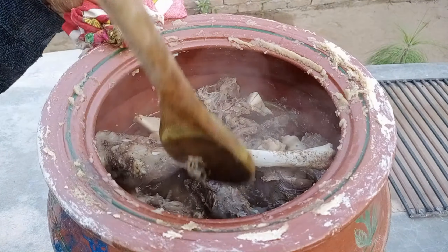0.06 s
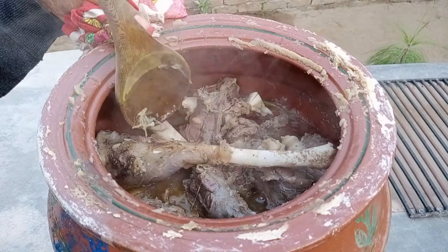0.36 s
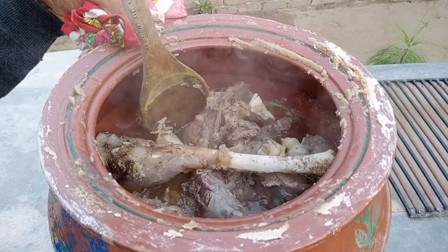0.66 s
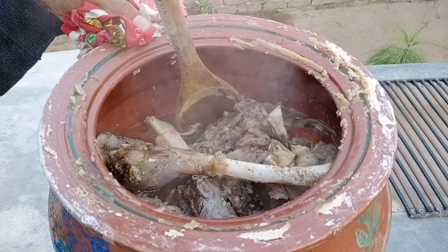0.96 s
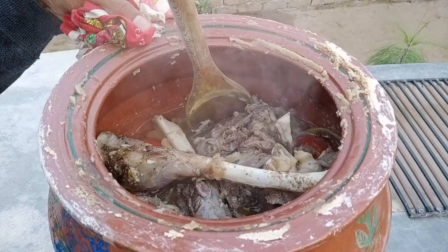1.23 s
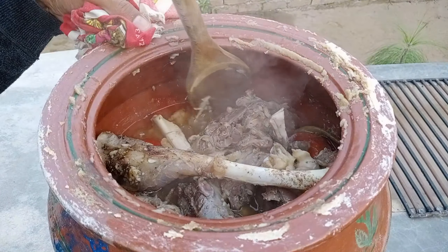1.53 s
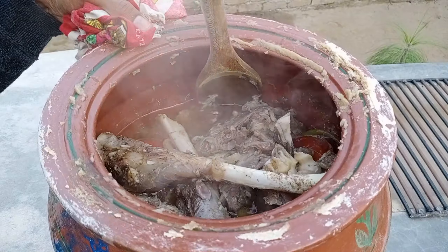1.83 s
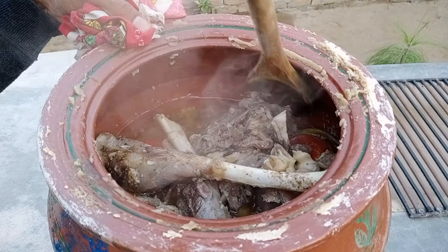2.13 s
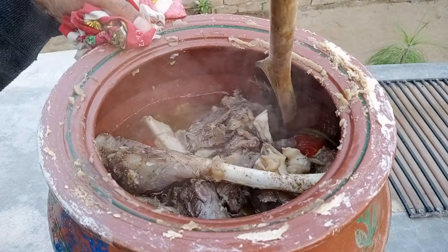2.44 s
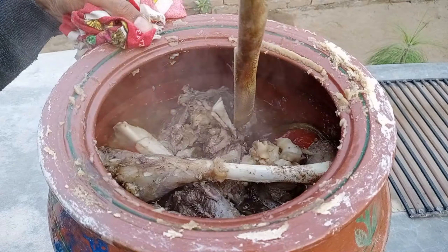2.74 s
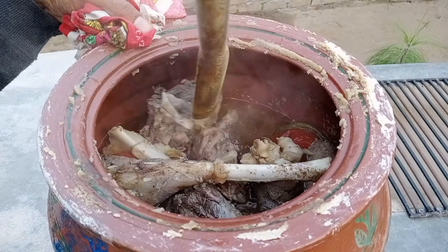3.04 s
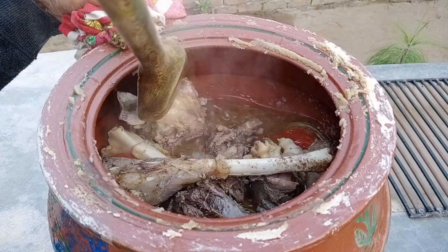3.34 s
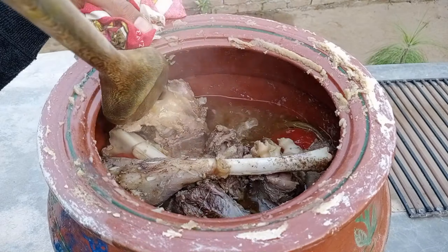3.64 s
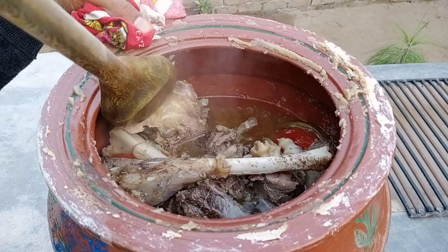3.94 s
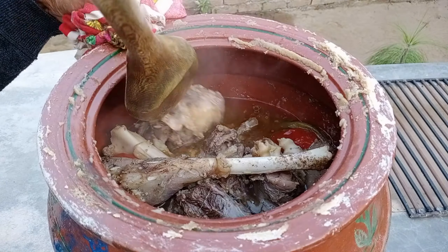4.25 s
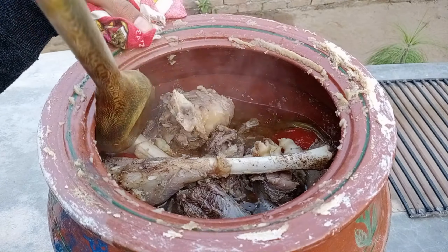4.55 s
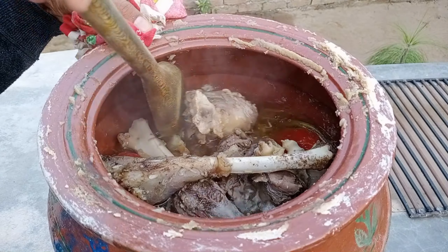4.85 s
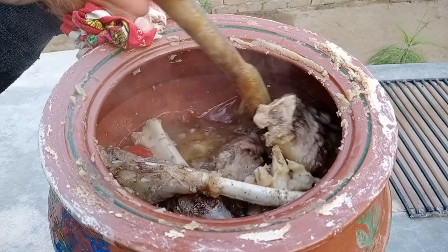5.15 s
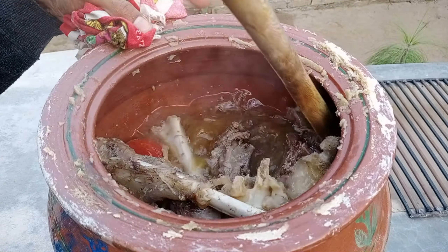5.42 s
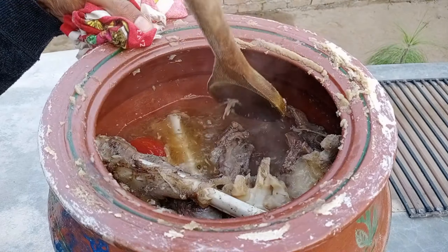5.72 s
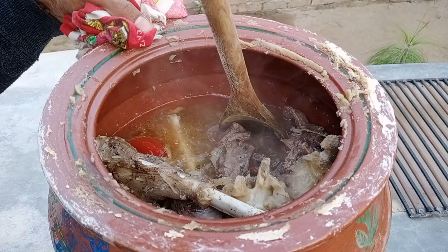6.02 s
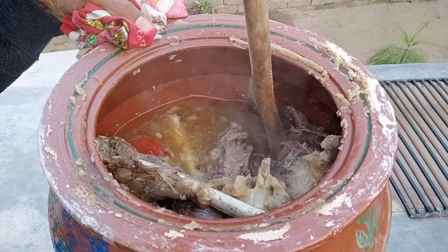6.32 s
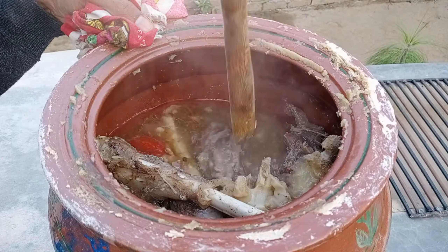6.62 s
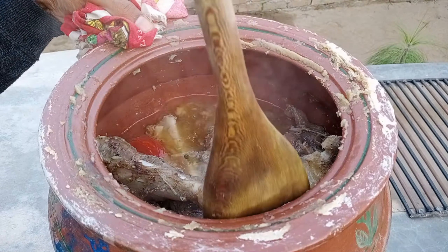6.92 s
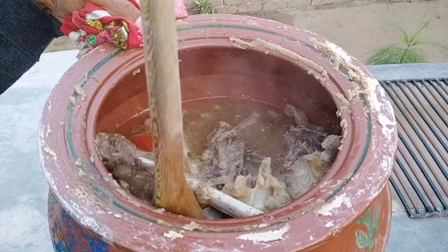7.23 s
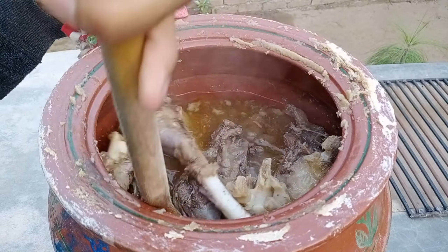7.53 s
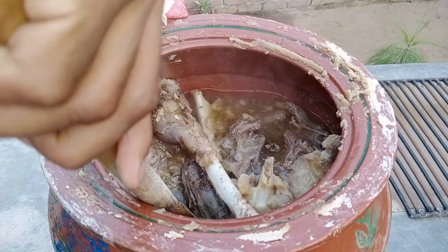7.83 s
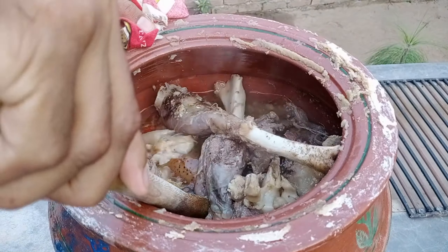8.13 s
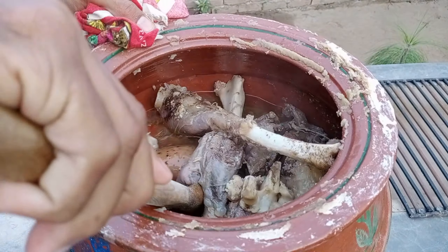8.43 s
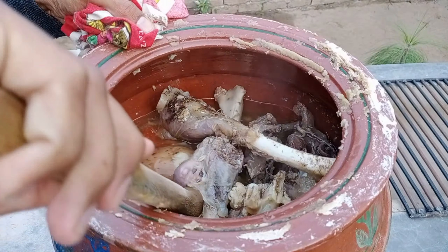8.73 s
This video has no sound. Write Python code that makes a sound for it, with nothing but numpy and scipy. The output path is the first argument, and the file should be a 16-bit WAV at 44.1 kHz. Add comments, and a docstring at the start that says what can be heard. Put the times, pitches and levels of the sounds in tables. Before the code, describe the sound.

Close to the microphone, meat and broth squelch and slosh in uneven strokes while a wooden spoon and bones knock and scrape a clay pot, making it ring briefly. Tiny bubbles pop and the heavy pot gives dull bumps. The strongest strokes come in the second half, ending with a loud plop and a few lighter wet smacks. Behind is a quiet yard with distant birds and a slight echo.

```python
"""Wet sloshes, smacks and hollow knocks, close up: a wooden spoon stirs meat, bones and broth in a clay pot.
Spoon and bones strike and scrape the clay, ringing its wall and the air inside. The broth plops in the
hollow, wet films on the meat tear and snap, and the heavy pot gives dull bumps. Birds whistle far off
over the soft air of a quiet yard, whose walls return a short echo."""
import sys
import numpy as np
from scipy import signal
from scipy.fft import rfft, irfft, next_fast_len
from scipy.io import wavfile
from scipy.ndimage import uniform_filter1d, map_coordinates

SR = 44100
rng = np.random.default_rng(int(sys.argv[2]) if len(sys.argv) > 2 else 0)


def generate_wav(sig):
    """Save sig (samples, or channels by samples) to the path in sys.argv[1] as 16-bit PCM at SR."""
    pcm = np.round(np.clip(np.atleast_2d(sig).T, -1, 1) * 32767).astype(np.int16)
    wavfile.write(sys.argv[1], SR, pcm)


N = 391166
T = np.arange(int(.6 * SR)) / SR  # time axis of a one-shot [s]

# knocks on the pot, ending with a small bright bone click and a plop's click:
# (time [s], level [dB], bass weight [dB], hardness [dB], favoured range [Hz],
# range left nearly still [Hz], ring length [x free ring], crack [dB])
KNOCKS = [(0.362, -32.5, -4.5, 1.5, 1086, 320, .78, 4.5), (1.4577, -28, 3.5, -4, 2000, 950, .73, 5),
          (1.861, -42, 2.5, 1.5, 600, 6500, .95, 5), (2.359, -34.5, -3, 2.5, 1300, 600, .7, 5),
          (4.368, -34, -3.5, -8, 1460, 2700, .7, 2.5), (4.578, -45, -2, 7, 910, 560, .83, 10),
          (5.22, -41.5, 0, -9, 843, 2700, .96, 19), (5.4568, -40.5, 2, -7.5, 1460, 900, .74, 2),
          (6.8773, -29, 1, -23, 1365, 950, .72, 7), (8.088, -53.5, -4, 0.5, 1660, 700, .9, 3),
          (8.468, -62, -14, 16, 3300, 1400, 1, 2), (8.809, -68.5, -4.5, 13, 625, 1800, .5, 2.5)]
# the registers in which a knock is balanced: (band edge [Hz])
REGISTERS = [200, 520, 750, 1100, 2000, 3400, 5300, 15000]
# modes of the clay wall: (frequency [Hz], level [dB], t60 [s])
CLAY = [(381, -2.5, 0.13), (564, -3, 0.33), (586, -1, 0.37), (876, 4, 0.14), (1235, -27.5, 0.087),
        (1273, -10, .16), (1322, -4, 0.14), (1529.7, 0, 0.24), (1568, -13, .22), (1871, -15, 0.049),
        (2160, -14, .09), (2500, -6.5, 0.14), (2830, -17, 0.017), (3340, -29, 0.16), (3538, -7.5, 0.13),
        (3810, -13.5, 0.12), (4410, -10, .06), (4447, -35, .05), (5470, -11, .05), (6700, -18, .04)]
# the wall's lightly damped notes, which sing on: (frequency [Hz], level [dB], t60 [s])
SINGING = [(605, -5, .35), (907, -4, 0.61), (1582, -0.5, 0.18), (2570, -7.5, 0.32), (3380, -13, 0.2),
           (4080, -15.5, 0.12)]
# modes of the air above the broth: (frequency [Hz], level [dB], t60 [s])
HOLLOW = [(169.2, -28, .15), (322, -1.5, 0.39), (366, 0, 0.26), (412, -4, 0.073), (490, -8.5, 0.1),
          (615, 7.5, 0.045), (885, -4, 0.19)]


def amp(db):
    """Decibels to gain."""
    return 10 ** (np.asarray(db) / 20)


def unit(x):
    """Scale to rms 1."""
    return x / np.sqrt(np.mean(x ** 2) + 1e-20)


def along(points, hz):
    """Read a (frequency [Hz], value) curve on a log axis."""
    freqs, values = np.transpose(points)
    return np.interp(np.log(hz + 1), np.log(freqs + 1), values)


def add(track, s, sound):
    """Mix a sound in at s seconds."""
    start = round(s * SR)
    sound = sound[max(0, -start):]
    room = track[max(0, start):][:len(sound)]
    room += sound[:len(room)]


def fade(t60):
    """Exponential decay; 1 - fade makes an attack."""
    return amp(-60 * T / max(t60, 1e-4))


def wobble(rate, size=N):
    """A smooth random curve, rate knots a second."""
    knots = rng.standard_normal(int(size * rate / SR) + 4)
    return map_coordinates(knots, [np.arange(size) * rate / SR])


def filtered(x, response):
    """Zero-phase EQ; response gives the gain at each frequency."""
    n = x.shape[-1]
    padded = next_fast_len(n + SR // 4)
    return irfft(rfft(x, padded) * response(np.fft.rfftfreq(padded, 1 / SR)), padded)[..., :n]


def coloured(x, points, size=4096):
    """Minimum-phase EQ through (frequency [Hz], gain [dB]) points."""
    cepstrum = irfft(np.log(amp(along(points, np.fft.rfftfreq(size, 1 / SR)))))
    cepstrum[1:size // 2] *= 2
    cepstrum[size // 2 + 1:] = 0
    return signal.fftconvolve(x, irfft(np.exp(rfft(cepstrum))))[:len(x)]


def ring(modes, length=1, scatter_db=2, detune=.003):
    """One ring of a set of modes, each with a fresh strength, tuning and polarity."""
    luck = rng.standard_normal((len(modes), 3))
    return sum(np.sign(polarity) * amp(db + scatter_db * strength) * fade(t60 * length)
               * np.sin(2 * np.pi * hz * (1 + detune * tuning) * T)
               for (hz, db, t60), (strength, tuning, polarity) in zip(modes, luck))


def through(x, modes, length=1):
    """x rings a set of modes, at unit energy gain."""
    answer = ring(modes, length)
    return signal.fftconvolve(x, answer / np.linalg.norm(answer))[:N]


def grains(rate, spread_db):
    """Random tiny impulses of uneven size, rms 1."""
    clicks = (rng.random(N) < rate / SR) * rng.choice([-1, 1], N)
    return unit(clicks * amp(spread_db * np.clip(rng.standard_normal(N), -2, 2)))


def shifting(x, depth_db, size=1024, frames=5):
    """Narrow resonances that come and go every few hundredths of a second."""
    spectra = signal.stft(x, nperseg=size, noverlap=size * 3 // 4)[2]
    field = rng.standard_normal(spectra.shape[-2:])
    for _ in range(2):
        field = uniform_filter1d(uniform_filter1d(field, size=4, axis=0), size=frames, axis=1)
    gain = amp(depth_db * np.clip(unit(field), -2, 2))
    return signal.istft(spectra * gain, nperseg=size, noverlap=size * 3 // 4)[1][..., :N]


def echo(x):
    """The yard's walls answer in stereo, each frequency dying at its own speed."""
    # decay of the yard: (frequency [Hz], t60 [s])
    decay = [(150, 0.4), (350, 0.58), (1500, 0.32), (4000, 0.09), (10000, 0.04)]
    hz, t, spectra = signal.stft(rng.standard_normal((2, len(T))), SR, nperseg=256)
    tail = signal.istft(spectra * amp(-60 * t / along(decay, hz)[:, None]), SR, nperseg=256)[1]
    predelayed = np.pad(x, (SR // 200, 0))
    return signal.fftconvolve(predelayed[None], tail / np.linalg.norm(tail[0]), axes=1)[:, :N]


def yard():
    """A bed of quiet, restless outdoor air, with a narrow band of hiss high up."""
    # tone of the air: (frequency [Hz], spectral density [dB])
    air_tone = [(15, -79), (25, -32), (91, 5), (198, 1.5), (421, -6), (523, -11), (871, -7), (1490, -10),
                (2170, -12), (2630, -15), (2920, -16), (6050, -27), (6920, -16.5), (7700, -26.5),
                (15500, -20)]
    # stereo width of the air: (frequency [Hz], left-right correlation [0..1])
    likeness = [(60, .94), (600, 0.28), (1400, 0.42), (3100, 0.23), (6800, 0.25), (15000, 0.23)]
    hiss_tone = [(5200, -48.5), (6300, -12.5), (6900, 4.0), (7400, -6.5), (8300, -31.5), (10000, -46.5)]

    def mid_side(hz):
        width = np.arccos(np.clip(along(likeness, hz), -1, 1)) / 2
        return amp(along(air_tone, hz)) * [np.cos(width), np.sin(width)]
    mid, side = filtered(rng.standard_normal((2, N)), mid_side)
    stereo = np.array([mid + side, mid - side])
    air = amp(-70 + 0.31 * wobble(1)) * unit(shifting(stereo, depth_db=3.5, frames=9))
    fizz = grains(rate=890, spread_db=4.0) + 0.27 * rng.standard_normal((2, N))
    hiss = filtered(fizz, lambda hz: amp(along(hiss_tone, hz)))
    return air + amp(-74.0 + 2.2 * wobble(0.98)) * unit(hiss)


def pressure_db(s):
    """Level of wet seeping as the spoon leans on the meat."""
    # weight of the resting spoon: (time [s], seeping level [dB])
    pressure = [(0, -67), (.5, -73), (1.1, -77.5), (2, -73), (2.95, -78.5), (3.3, -68.5), (5.3, -70.5),
                (5.6, -82), (6.85, -74.5), (7.5, -72), (8.85, -71)]
    return np.interp(s, *np.transpose(pressure))


def push(rise, t60, swell_db=23.5):
    """A swell that gains swell_db over its rise, peaks after one span of T and dies away."""
    return np.concatenate([amp(-swell_db * (T[::-1] / rise) ** 2), fade(t60)])


def stir_envelopes():
    """Slosh, scrape and squelch gains: the resting spoon, every push and the sway after each knock."""
    # pushes of the spoon: (peak time [s], rise [s], slosh [dB], scrape [dB], squelch [dB])
    pushes = [(0.521, .012, -58, -54.5, -55), (0.78, .17, -58, -49, -58), (1.565, 0.12, -47, -45.5, -62.5),
              (2.002, .15, -50, -41.5, -57.5), (2.195, 0.11, -54, -60, -79), (2.47, .06, -53, -70, -80.5),
              (2.605, 0.063, -51, -43.5, -48), (2.66, 0.0475, -55.5, -78, -65.5),
              (3.462, 0.083, -81, -78, -59.5), (3.81, 0.13, -98.5, -55.5, -84), (4.15, 0.16, -69, -73, -67),
              (4.541, 0.1, -66, -51, -57), (4.727, 0.065, -53, -52, -49), (4.99, 0.13, -53, -57, -63.5),
              (5.15, .16, -48, -43.5, -53.5), (5.297, 0.12, -40.5, -38, -45.5),
              (5.52, 0.045, -54.5, -78, -86), (6.991, 0.1, -51.5, -47.5, -60),
              (7.191, 0.094, -39.5, -34.5, -52.5), (7.521, 0.14, -80.5, -61.5, -65),
              (8.12, 0.04, -53, -70, -67.5), (8.29, 0.15, -102, -80.5, -61), (8.56, 0.092, -83, -75, -60)]
    slosh_lag_s, slosh_stretch, slosh_t60 = 0.0093, 1.4, 0.28  # broth follows late and gathers slowly
    sway_db, sway_delay_s = -17.5, 0.077  # relative to the knock
    rest = amp(pressure_db(np.arange(N) / SR))
    slosh, scrape, squelch = amp(-10.5) * rest, amp(-9) * rest, amp(0.5) * rest
    for s, rise, slosh_db, scrape_db, squelch_db in pushes:
        start = s - T[-1]
        add(slosh, start + slosh_lag_s, amp(slosh_db) * push(rise * slosh_stretch, slosh_t60))
        add(scrape, start, amp(scrape_db) * push(rise, t60=0.21))
        add(squelch, start, amp(squelch_db) * push(rise, t60=0.2))
    for s, db, *_ in KNOCKS:
        add(slosh, s + sway_delay_s - T[-1], amp(db + sway_db) * push(sway_delay_s / 2, slosh_t60))
    return slosh, scrape, squelch


def stirring():
    """The spoon pushes broth about the hollow, drags on the clay and squeezes wet meat."""
    # tone of lapping broth: (frequency [Hz], gain [dB])
    splash_tone = [(50, -33.5), (110, -12.5), (200, -9.5), (310, 5), (450, 2.5), (600, -4), (750, -16),
                   (1000, -7), (1500, -23.5), (3000, -60)]
    # tone of wood dragging on clay: (frequency [Hz], gain [dB])
    rasp_tone = [(500, -37.5), (1100, -6.5), (1600, 3), (2600, 1), (3400, -3.5), (4500, -15), (8000, -59.5)]
    # tone of squeezed meat: (frequency [Hz], gain [dB])
    squelch_tone = [(1500, -33), (3000, -11), (4000, 3.5), (5000, -6.5), (7000, 7.5), (8500, -12.5),
                    (10000, -29.5), (15000, -27.5)]
    slosh, scrape, squelch = stir_envelopes()
    lapping = unit(coloured(grains(rate=540, spread_db=3.5), splash_tone))
    hollow = unit(through(lapping, HOLLOW, length=0.59))
    broth = slosh * unit(shifting(lapping + hollow, depth_db=6.0))
    # the contact point wanders, so ever different modes of the wall answer
    slips = grains(rate=1200, spread_db=5.0)
    rubbed = slips + .85 * through(slips, CLAY, length=.35)
    clay = scrape * unit(shifting(coloured(rubbed, rasp_tone), depth_db=9.5))
    # only a firm stroke sets the whole wall singing
    firm = scrape / (scrape + amp(-45))
    singing = through(firm * scrape * slips, SINGING)
    # wet films tear in clumps: some crackle openly, some inside air pockets that keep changing shape
    clumps = grains(rate=1300, spread_db=-0.5) * amp(3.54 * wobble(50))
    tearing = unit(coloured(clumps, squelch_tone))
    pocketed = unit(shifting(tearing, depth_db=9.0, frames=7))
    meat = squelch * unit(0.55 * tearing + pocketed)
    return amp(-2) * broth + amp(-6) * clay + amp(-10) * singing + amp(-1) * meat


def smack(db, hz, spray_db):
    """A wet film lets go in a quick burst, rings a few tiny cavities and throws fine spray."""
    t60 = .018
    burst = (fade(t60) + 0.027 * fade(3 * t60)) * (1 - fade(0.002))
    snap, spray = rng.standard_normal((2, len(T))) * burst
    body = coloured(snap, [(300, -45), (hz / 2, -22), (hz * 0.89, -12), (hz, 0),
                           (hz * 1.2, -10), (hz * 1.3, -25), (hz * 2, -32)])
    cavities = ring([(hz, 0, .03), (hz * 0.9, -8, .035), (hz * 0.24, -14, .045), (hz * 0.13, -18, .045)],
                    scatter_db=3, detune=.04)
    spray = coloured(spray, [(2000, -55.5), (5000, -9.5), (8000, -2), (15000, -19.5)])
    wet = body / np.abs(body).max() + 0.31 * cavities * (1 - fade(0.0065))
    return amp(db) * (amp(-7.5) * wet + amp(spray_db - 2) * spray / np.abs(spray).max())


def meat_smacks():
    """Films on the meat tear in steps: a smack, then two weaker after-snaps."""
    # the louder smacks: (time [s], level [dB], pitch [Hz], spray [dB])
    smacks = [(0.1137, -32.5, 7870, 1), (0.5184, -39, 4020, -18), (0.7433, -38.5, 2540, -40),
              (1.548, -35, 6610, -34.5), (2.141, -29.5, 7290, -13), (2.2212, -33, 6670, -35),
              (2.596, -25.5, 2697, -8), (3.3063, -40, 2930, -28), (3.8045, -33.5, 6530, -35),
              (4.1313, -49, 6800, -35), (4.2713, -32, 7060, -32), (5.1511, -30.5, 6260, -36.5),
              (5.347, -32, 7480, -23), (5.5042, -35.5, 7100, -27.5), (5.8846, -38.5, 7130, -35),
              (5.9505, -36.5, 6780, -31.5), (6.398, -40, 6850, -33), (6.5359, -41.5, 6730, -39.5),
              (6.576, -38.5, 7110, -6.5), (7.990, -38.5, 6980, -36), (8.2044, -34.5, 5260, -22)]
    step_db = -11.5
    gaps_s = 0.0083 * rng.uniform(0.56, 2.4, (len(smacks), 2))
    out = np.zeros(N)
    for (s, db, hz, spray_db), gaps in zip(smacks, gaps_s):
        for step, delay in enumerate([0, *np.cumsum(gaps)]):
            add(out, s + delay, smack(db + step_db * step, hz, spray_db))
    return out


def random_smacks():
    """Further small smacks at random times: wet films let go, louder when the spoon presses."""
    pops_per_s, centre_hz, spread_db = 15, 6840, 3.5
    out = np.zeros(N)
    for when, size, pitch in rng.uniform(-1, 1, (int(pops_per_s * N / SR), 3)):
        s = (when + 1) / 2 * N / SR
        db = pressure_db(s) + 20 + spread_db * size
        add(out, s, smack(db, centre_hz * (1 + .08 * pitch), spray_db=-23))
    return out


def birds():
    """Gliding, raspy whistles, smeared by distance; the farthest are falling chirps at random times."""
    # the nearer calls: (time [s], length [s], start pitch [Hz], end pitch [Hz], level [dB])
    near_calls = [(0.235, .11, 2700, 2490, -69), (0.913, 0.15, 2674, 2400, -72),
                  (1.252, .11, 5400, 4744, -62), (1.265, 0.11, 4060, 3380, -61.5),
                  (1.561, .08, 3960, 3660, -65), (1.57, .08, 5490, 4900, -62),
                  (1.691, 0.075, 1507, 1670, -66), (2.899, 0.093, 1297, 1270, -73.5),
                  (3.363, 0.12, 1270, 1158, -74.5), (3.497, .14, 1098, 1089, -67.5),
                  (3.677, 0.4, 1597, 1683, -75), (4.169, 0.058, 2165, 2160, -71),
                  (5.56, 0.098, 2650, 2600, -73.5), (5.673, 0.093, 1107, 1135, -63),
                  (5.79, 0.12, 874, 1013, -61.5), (5.986, 0.052, 1472, 1420, -71)]
    far_per_s, far_s, far_db, far_hz, spread_octaves, fall_ratio = 1.5, 0.056, -75.5, 1390, .25, 0.46
    far_calls = []
    for when, height in rng.random((int(far_per_s * N / SR), 2)):
        hz = far_hz * 2 ** (spread_octaves * (2 * height - 1))
        far_calls.append((when * N / SR, far_s, hz, hz * fall_ratio, far_db))
    out = np.zeros(N)
    for s, length, start_hz, end_hz, db in near_calls + far_calls:
        progress = np.linspace(0, 1, int(length * SR))
        glide = start_hz + (end_hz - start_hz) * progress ** 1.6
        pitch = glide * (1 + .027 * wobble(500, len(progress)))
        swell = np.sqrt(np.abs(np.sin(np.pi * progress))) * amp(3.1 * wobble(130, len(progress)))
        add(out, s, amp(db + 4) * swell * np.sin(2 * np.pi * np.cumsum(pitch) / SR))
    return .5 * out + .85 * echo(out)


def register_levels(x, size=8192):
    """Level [dB] in each register over the first 50 ms of a knock."""
    attack = np.pad(x, (SR // 300, 0))[:SR // 20]
    spectrum = rfft(attack * signal.windows.tukey(len(attack), .12), size)
    power = np.abs(spectrum) ** 2 * 2 / size / len(attack)
    band_power = np.histogram(np.fft.rfftfreq(size, 1 / SR), REGISTERS, weights=power)[0]
    return 10 * np.log10(band_power + 1e-20)


def knocks_and_clicks():
    """Knocks and small clicks ring spoon, clay and hollow; weight adds bass, hardness adds bite."""
    # modes of the hand-damped spoon: (frequency [Hz], level [dB], t60 [s])
    spoon_modes = [(302, -7.5, 0.01), (595, 2, 0.0087), (1170, 2, 0.0067), (1480, -9.5, 0.029),
                   (1850, -9.5, 0.029), (2290, -2.5, 0.036), (2920, -3, 0.025), (4540, -12, 0.033)]
    # tone of an average knock: (frequency [Hz], register level [dB])
    knock_tone = [(320, -8.5), (620, -4.5), (900, -4), (1500, -2.5), (2600, -8), (4200, -15), (9000, -22)]
    # bass lift of a heavy knock: (frequency [Hz], share of the weight [dB/dB])
    weight = [(320, 0.79), (620, 0.41), (1100, 0.11)]
    # treble lift of a hard contact: (frequency [Hz], share of the hardness [dB/dB])
    hardness = [(1500, 0.059), (2600, 0.28), (4200, 1.09), (9000, 1.2)]
    crack_tone = [(30, -42), (100, -25), (350, 0), (2800, 3.0), (4700, -9.0), (5400, -16.5),
                  (7000, -5.5), (9000, -35.0), (15000, -45.5)]
    rattle_tone = [(30, -43.5), (110, -19), (240, -2.5), (450, 4.0), (750, -3.5), (2200, -11),
                   (3300, -18.5), (6000, -31), (12000, -52)]
    spot_boost_db, node_cut_db, spot_octaves = 4.5, 6, 0.53  # the spot struck colours a knock
    centres = np.sqrt(np.multiply(REGISTERS[1:], REGISTERS[:-1]))
    bell = lambda hz: np.exp(-(np.log2(centres / hz) / spot_octaves) ** 2)
    out = np.zeros(N)
    for s, db, weight_db, hard_db, spot_hz, node_hz, length, crack_db in KNOCKS:
        spot = spot_boost_db * bell(spot_hz) - node_cut_db * bell(node_hz)
        tilt = weight_db * along(weight, centres) + hard_db * along(hardness, centres)
        levels = db + along(knock_tone, centres) + tilt + spot
        crack, rattle = rng.standard_normal((2, len(T)))
        crack = coloured(crack * fade(0.024), crack_tone)
        rattle = coloured(rattle * fade(0.19), rattle_tone)  # the jolted contents rumble briefly
        pot = ring(CLAY, length) + amp(-4) * ring(HOLLOW) + amp(-15.5) * ring(SINGING, length)
        spoon = ring(spoon_modes, detune=0.053)
        hit = pot + amp(crack_db + 7.5) * crack + amp(crack_db - 0.5) * spoon + amp(9.5) * rattle
        for _ in range(3):  # EQ each register towards its level
            hit = coloured(hit, np.column_stack([centres, levels - register_levels(hit)]))
        # the small pot radiates little bass
        hit = coloured(hit, [(30, -34), (70, -19.5), (160, -10.5), (270, -.5)])
        add(out, s, hit)
        # a soft lead-in: on a knock, the wood grazing just before it lands
        add(out, s - .009, amp(-16) * hit * (1 - fade(0.12)) * fade(0.071))
    return out


def plops_and_hollow_notes():
    """Short plops in the broth and long low notes of the pot's hollow ringing on; each creeps up in pitch."""
    # short plops and long hollow notes: (time [s], level [dB], pitch [Hz], t60 [s])
    notes = [(0.487, -26, 387, 0.029), (.518, -31.5, 476, 0.028), (1.552, -27.5, 824, 0.055),
             (1.556, -23, 405, 0.03), (2.127, -33.5, 910, 0.078), (2.139, -41, 330, 0.41),
             (2.598, -39.5, 327, 0.41), (4.577, -13.5, 439, 0.024), (4.7365, -28.5, 861, 0.048),
             (4.742, -39, 337.4, 0.43), (5.1, -40.5, 228, 0.049), (5.164, -36, 203, 0.11),
             (5.192, -26, 853, 0.063), (5.255, -29, 614, 0.082), (7.2025, -4, 408, 0.015),
             (7.207, -27, 907, 0.055), (7.254, -29, 910, 0.046), (8.466, -42.5, 457, 0.084),
             (8.807, -24, 483, 0.024), (8.811, -34.5, 888, 0.059)]
    out = np.zeros(N)
    for s, db, hz, t60 in notes:
        pitch = hz * (1.04 - .08 * fade(t60))
        envelope = amp(db - 3) * fade(t60) * (1 - fade(0.016))
        add(out, s, envelope * np.sin(2 * np.pi * np.cumsum(pitch) / SR))
    return coloured(out, [(30, -15.5), (220, 0)]) + amp(-26.5) * through(out, HOLLOW)


def bumps():
    """The heavy pot and the spoon's handle give dull, quickly damped thuds."""
    # soft bumps: (time [s], level [dB], pitch [Hz])
    thuds = [(1.462, -41, 166.3), (4.37, -47, 115), (1.557, -38.5, 136.6), (4.601, -40, 151),
             (5.152, -38, 151), (5.225, -39, 181), (6.658, -47, 107), (7.025, -41.5, 117),
             (7.205, -31, 122), (7.442, -47.5, 98)]
    envelope = fade(0.05) * (1 - fade(0.15))
    out = np.zeros(N)
    for s, db, hz in thuds:
        add(out, s, amp(db + 6.5) * envelope * np.sin(2 * np.pi * hz * T))
    return coloured(out, [(40, -44.0), (85, 3.5)])


def scene():
    """The pot close by with a touch of echo, birds and air behind it."""
    pot = knocks_and_clicks() + stirring() + plops_and_hollow_notes()
    pot += meat_smacks() + random_smacks() + bumps()
    return pot + amp(-26) * echo(pot) + birds() + yard()


def record(dry):
    """The left microphone port hears more lows and mids, the right more top; both are band-limited."""
    # balance of the ports: (frequency [Hz], left over right [dB])
    balance = [(60, 3), (380, 3.5), (700, 4), (1290, 6.5), (2400, 3.5), (4400, 5), (6000, 3.5),
               (7200, -5.5), (9000, -13.5), (12000, -1)]
    top_hz = 15600

    def ports(hz):
        ratio = amp(along(balance, hz))
        return np.array([ratio, np.ones_like(ratio)]) * 2 / (1 + ratio) * (hz < top_hz)
    return filtered(dry, ports)


dry = scene()
out = record(dry)
generate_wav(out)
```